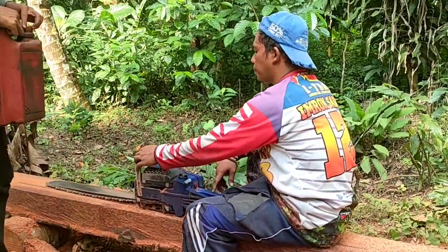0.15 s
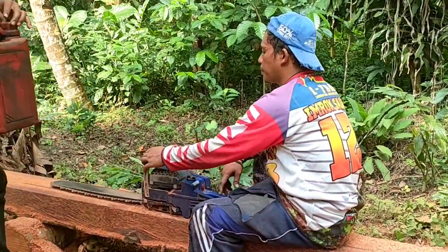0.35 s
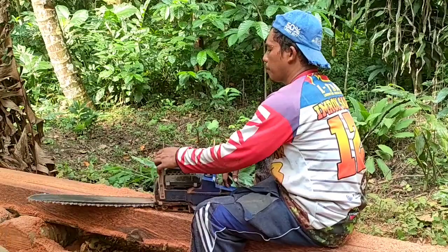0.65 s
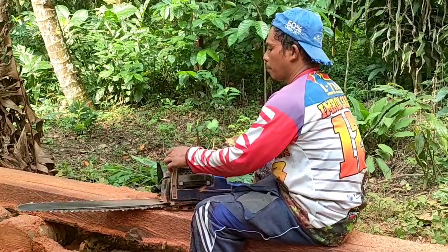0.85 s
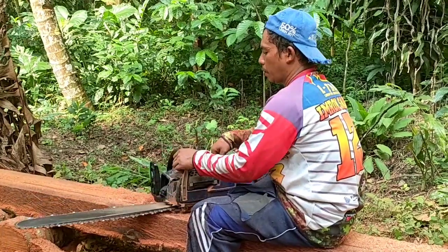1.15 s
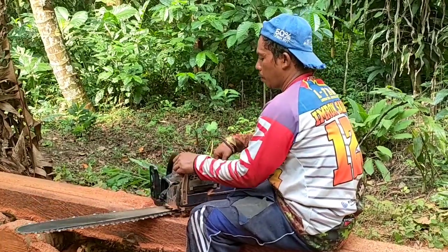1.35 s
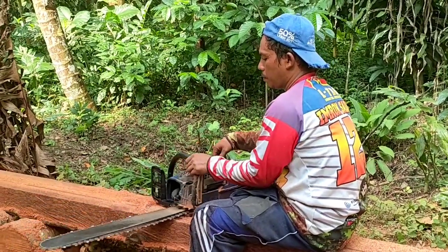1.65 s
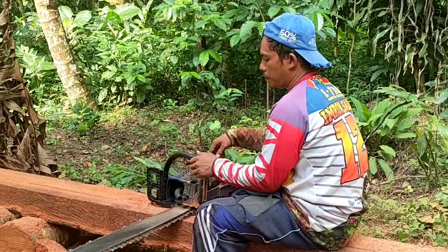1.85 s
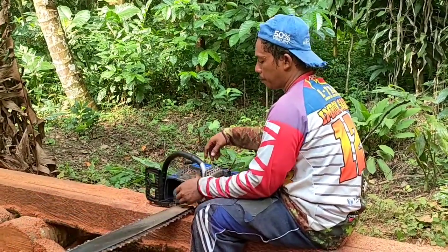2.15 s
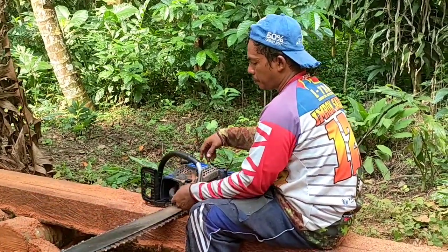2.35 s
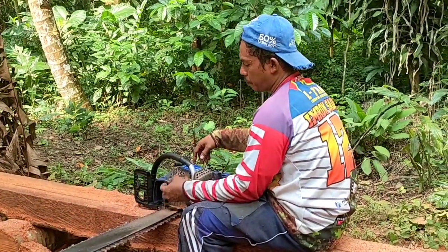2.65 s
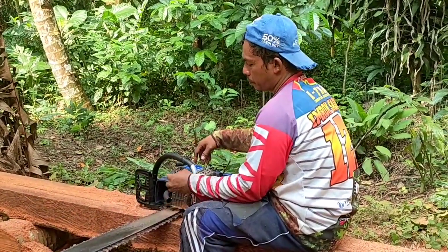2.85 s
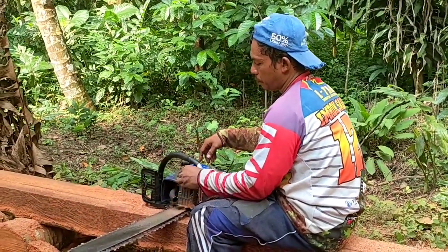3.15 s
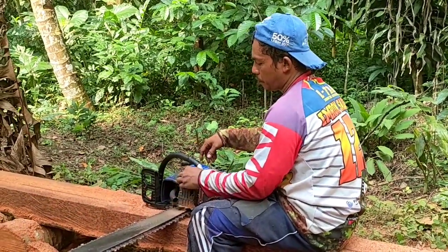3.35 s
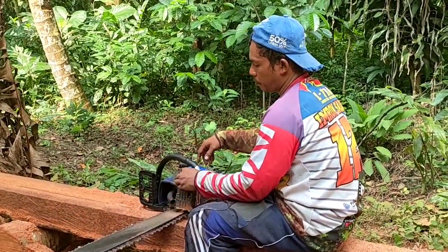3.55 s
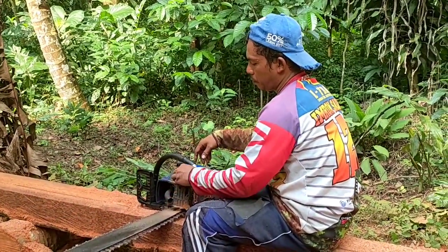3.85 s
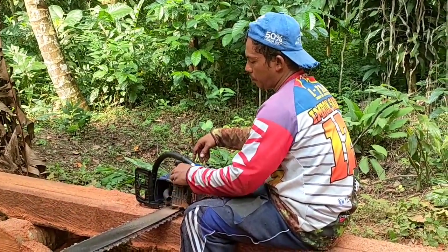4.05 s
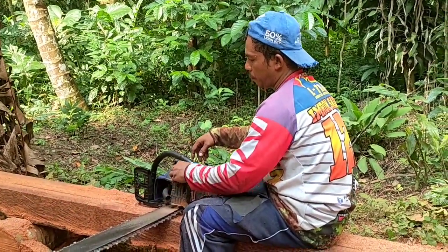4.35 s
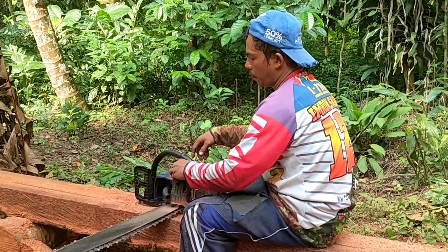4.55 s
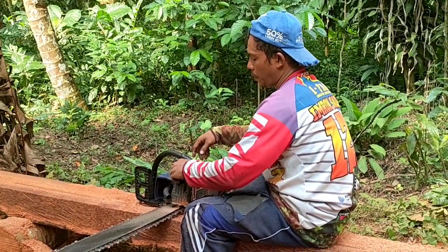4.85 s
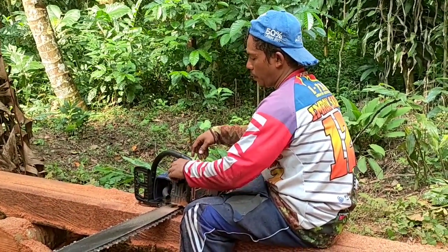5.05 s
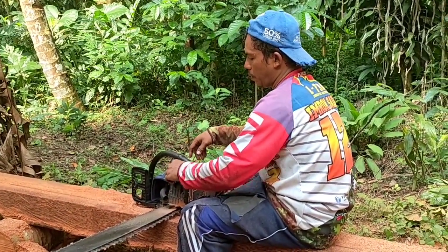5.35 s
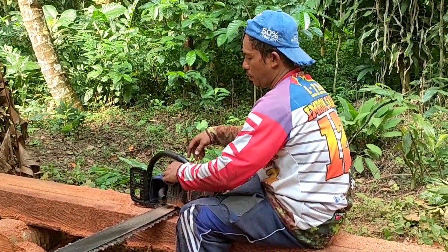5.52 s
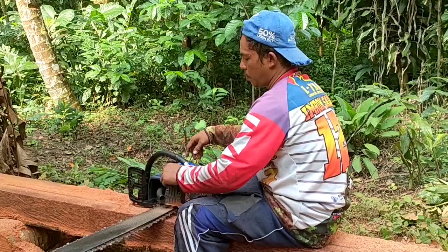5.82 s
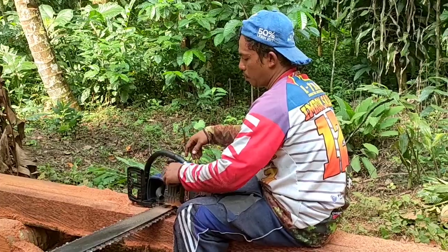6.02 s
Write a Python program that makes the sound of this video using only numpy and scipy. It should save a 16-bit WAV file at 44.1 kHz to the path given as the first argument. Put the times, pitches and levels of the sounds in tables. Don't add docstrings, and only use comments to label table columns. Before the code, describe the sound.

A close, dry outdoor stereo sound of hands handling a stopped chainsaw on a wooden beam, slightly left. From 0 to 0.8 s there is a busy flurry of small clicks, hollow casing taps, scraping and sleeve rustle, with a clear click at 0.5. After a lull, a cluster of taps and ticks comes at 1.2-1.5, then near quiet. At 2.3-2.4 dull bumps and ticks return; small ticks lead to a sharp bright snap at 2.9 with crisp rubbing until 3.1. Light clicks continue, one stronger at 3.75. From 4 s short rubbery squeaks appear. At 4.5 a hard, low wooden knock, by far the loudest, shakes loose parts and chain into a brief rattle. Squeaks fade by about 5 and sparse soft ticks and rubs continue to about 6.2. Faint leaves, insects and a wavering distant engine remain behind.

```python
import sys
import numpy as np
from scipy import signal
from scipy.io import wavfile
from scipy.ndimage import uniform_filter1d

SR = 44100
rng = np.random.default_rng(int(sys.argv[2]) if len(sys.argv) > 2 else 0)


def generate_wav(signal):
    frames = np.transpose(np.atleast_2d(signal))
    scaled = np.clip(frames, -1, 1) * 32767
    pcm = np.round(scaled).astype(np.int16)
    wavfile.write(sys.argv[1], SR, pcm)


def gain_from_db(level_db):
    decades = np.asarray(level_db, float) / 20
    return 10 ** decades


N = 272538
RATTLE_S = 4.4935


def rms_one(x):
    return x / np.sqrt(np.mean(x ** 2) + 1e-20)


def in_time(rows):
    s, *columns = np.transpose(rows)
    return [np.interp(np.arange(N) / SR, s, column) for column in columns]


def at_hz(points, hz):
    point_hz, values = np.array(points)[:, :2].T
    return np.interp(np.log(hz), np.log(point_hz), values)


def drift(rate):
    r = np.exp(-80 * np.pi * rate / SR)
    white = rng.standard_normal(N // 40 + 2002)
    slow = signal.lfilter([1], [1, -2 * r, r * r], white)[2000:]
    return np.interp(np.arange(N) / 40, np.arange(len(slow)), rms_one(slow))


def moves(rows, rise_db_s, fall_db_s, rest_db):
    s, hold, level_db = np.transpose(rows)[:, :, None]
    t = np.arange(0, N + 64, 64) / SR
    rise_db = rise_db_s * np.maximum(s - t, 0)
    fall_db = fall_db_s * np.maximum(t - s - hold, 0)
    each_db = level_db - rise_db - fall_db
    return np.interp(np.arange(N) / SR, t, np.maximum(each_db.max(axis=0), rest_db))


def band_pass(x, low_hz, high_hz, order=2):
    return signal.sosfilt(signal.butter(order, [low_hz, high_hz], "band", fs=SR, output="sos"), x)


def ring(x, hz, t60):
    r, w = gain_from_db(-60 / (t60 * SR)), 2 * np.pi * hz / SR
    return signal.lfilter([0, np.sin(w)], [1, -2 * r * np.cos(w), r * r], x + 1e-18)


def resonances(x, peaks):
    return rms_one(sum(gain_from_db(db) * np.sqrt(width_hz) * ring(x, hz, 2.0 / width_hz)
                       for hz, width_hz, db in peaks))


def grains(per_s, spread_db):
    sizes = gain_from_db(spread_db * np.minimum(rng.exponential(1, N), 4)) * rng.standard_normal(N)
    return rms_one(sizes * (rng.random(N) < per_s / SR))


def coloured(white, spectrum, patchy_db, mix=lambda band, hz: band):
    out, together = 0, drift(7.0)
    edges = spectrum[0][0] * 2 ** np.arange(0, 10, 1 / 3)
    edges = edges[edges < min(spectrum[-1][0] * 1.2, 17000)]
    for k, (low, high) in enumerate(zip(edges, edges[1:])):
        band = band_pass(white[k % 2], low, high)
        hz = np.sqrt(low * high)
        level_db = at_hz(spectrum, hz) + patchy_db * (together + drift(13.0))
        out = out + gain_from_db(level_db) * mix(band, hz)
    return rms_one(out)


def at_ports(x, count=17):
    x = x * np.ones((2, 1))
    return np.array([np.roll(x[0], -(count // 2)), np.roll(x[1], count - count // 2)])


def spread(x, likeness):
    share = np.clip(likeness, 0, 1)
    return np.sqrt(share) * at_ports(x[0]) + np.sqrt(1 - share) * x[1:]


def knock():
    # start in seconds, signed push, contact in seconds.
    touches = [
        (4.4946, .75, .008),
        (4.5108, 1, .0012),
        (4.5186, -.59, .0016),
        (4.5366, 1, .0065),
    ]
    # mode in Hz, signed strength at the struck spot, t60 in seconds.
    beam = [(88.5, -.058, .23), (149.6, .304, .061), (191.3, -.1, .24), (240.7, -1, .032),
            (249.1, .782, .087), (309.1, .144, .072), (453.8, .05, .086), (518.3, -.044, .117),
            (625.9, .051, .12), (776, -.006, .12)]
    force = np.zeros(N)
    for s, push, contact in touches:
        bump = np.sin(np.pi * np.arange(int(contact * SR)) / (contact * SR))
        force[round(s * SR):][:len(bump)] += push * bump / bump.sum()
    blow = sum(strength * ring(force, hz, t60) for hz, strength, t60 in beam)
    return at_ports(blow * gain_from_db(np.array([[.45], [-.45]])), count=5)


def twist():
    # mode in Hz, peak in dB, t60 in seconds, right port against left (signed ratio).
    modes = [(452, -18.5, .028, -.9), (600, -26, .03, -.4), (760, -39, .03, .8)]
    click, out = (np.arange(N) == round(4.5135 * SR)) * 1., 0
    for hz, level_db, t60, right in modes:
        mode = ring(ring(click, hz, t60), hz, t60)
        out = out + gain_from_db(level_db) * mode / np.abs(mode).max() * np.array([[1], [right]])
    return out


def rattle_shape(level_db, hold_s, t60):
    t = np.arange(N) / SR - RATTLE_S
    return (t > 0) * gain_from_db(level_db - 60 * np.clip(t - hold_s, 0, 1) / t60)


def clatter():
    noise = uniform_filter1d(rng.standard_normal((3, N)), size=2)
    return rattle_shape(-39, .02, .16) * spread(rms_one(band_pass(noise, 900, 4700)), 0.72)


def jingle():
    # resonance in Hz, width in Hz, level in dB.
    links = [(4150, 760, 10), (7100, 1300, -17), (9850, 700, -11), (11600, 600, -2), (13400, 700, -5)]
    return rattle_shape(-54, .018, .13) * spread(resonances(rng.standard_normal((3, N)), links), .7)


def thuds():
    # start in seconds, peak in dB, pitch in Hz, t60 in seconds, casing body in dB.
    slaps = [
        (4.496, -33, 476, 0.065, -7),
        (4.515, -28.5, 610, 0.2, 2.5),
        (4.538, -30, 455, 0.051, -0.5),
    ]
    # start in seconds, peak in dB, pitch in Hz, t60 in seconds.
    taps = [(.039, -47, 870, 0.046), (.198, -44.5, 810, 0.27), (.268, -40.5, 810, 0.15),
            (.529, -43.5, 835, 0.24), (.702, -47.5, 876, 0.22), (1.2275, -39.5, 780, 0.033),
            (1.237, -60, 750, 0.025), (1.372, -55, 820, 0.066), (1.417, -49.5, 810, 0.14),
            (1.495, -49, 786, 0.14), (1.273, -42, 755, 0.13), (1.349, -49, 875, .033),
            (2.3795, -37, 545, 0.045), (2.638, -44.5, 528, 0.052), (2.92, -52, 355, 0.018),
            (3.359, -39.5, 1080, 0.038), (3.946, -47.5, 714, 0.044)]
    # start in seconds, peak in dB, pitch in Hz, casing body in dB.
    bumps = [(0.098, -46.5, 169, -17), (1.509, -53, 175, 0), (1.805, -49, 183, -7.5), (1.914, -50, 140, -9),
             (2.381, -38.5, 191, 9.5), (2.394, -40.5, 197, 4), (2.416, -43.5, 274, 9.5),
             (2.515, -52.5, 192.6, 6.5), (3.365, -55.5, 190, -21), (3.515, -55, 175, -17),
             (3.893, -51, 156, 9), (4.038, -52, 140, -24), (4.364, -53.5, 124.2, -11),
             (4.738, -50.5, 120, -14), (4.868, -48, 193, -10), (4.987, -59, 125, 12), (5.014, -44, 172, 0),
             (6.124, -46, 165.9, 2)]
    tap_body_db, bump_t60 = -50, 0.052
    hits = list(slaps) + [(*row, tap_body_db) for row in taps]
    hits += [(s, level_db, hz, bump_t60, body_db) for s, level_db, hz, body_db in bumps]
    out, t = np.zeros(N + 8000), np.arange(8000) / SR
    for s, level_db, hz, t60, body_db in hits:
        push = rng.standard_normal(len(t)) * gain_from_db(-60 * t / (0.45 * t60))
        body = band_pass(push, 300, 1200)
        tone = ring(np.diff(push, prepend=0), hz, 4.4 / hz)
        tone = ring(tone, hz, min(t60, 22 / hz))
        hit = tone / np.abs(tone).max() + gain_from_db(body_db) * body / np.abs(body).max()
        out[round(s * SR):][:len(t)] += gain_from_db(level_db) * hit
    return out[:N]


def snaps():
    # start in seconds, peak in dB, low mode in Hz, high mode in Hz, t60 in seconds.
    contacts = [(.0139, -35, 1500, 5500, .012), (.0408, -39, 1000, 4000, .015),
                (.0548, -39, 1200, 5500, .012), (.0680, -38, 1500, 4500, .012),
                (.0762, -38, 1500, 4600, .015), (.1022, -36, 900, 4200, .015),
                (.5036, -36, 1900, 4300, .03), (2.9247, -20, 3000, 5540, .018),
                (2.9262, -31, 3500, 5200, .02), (3.7502, -28.5, 2560, 4740, .016),
                (3.7625, -38, 3300, 4700, .012), (.124, -42, 4000, 4300, .015),
                (.0475, -40, 1300, 5500, .012), (1.2362, -40, 3200, 3600, .02),
                (1.3735, -42, 2300, 3400, .015), (2.858, -37, 2850, 3500, .02),
                (4.5875, -37, 2100, 2900, .03), (2.4135, -33, 3100, 4100, .02),
                (2.421, -38, 3100, 4600, .02), (2.3985, -38, 3100, 4500, .015)]
    out, t = np.zeros((2, N + 2000)), np.arange(2000) / SR
    wide = signal.butter(2, 1500, "high", fs=SR, output="sos")
    for s, level_db, low_hz, high_hz, t60 in contacts:
        shared, left, right = rng.standard_normal((3, len(t))) * gain_from_db(-60 * t / .009)
        shared[0] += 5
        push = shared + .4 * np.array([left, right])
        softness = signal.butter(4, high_hz ** 2 / 3800, fs=SR, output="sos")
        push = signal.sosfilt(softness, push)
        modes = ring(push, low_hz, .3 * t60) + .8 * ring(push, high_hz, .35 * t60)
        modes = modes + .3 * ring(push, 1.3 * high_hz, .25 * t60)
        crack = signal.sosfilt(wide, push)
        hit = .8 * modes / np.abs(modes).max() + 1.1 * crack / np.abs(push).max()
        out[:, round(s * SR):][:, :len(t)] += gain_from_db(level_db + 2.5) * hit
    return out[:, :N]


def ticks():
    # start in seconds, peak in dB, pitch in Hz, t60 in seconds.
    touches = [(0.8288, -46, 3570, 0.017), (1.225, -34.5, 1770, 0.042), (1.271, -38, 3300, 0.032),
               (1.3707, -41, 3180, 0.031), (1.43, -51, 2760, 0.018), (1.5083, -44.5, 2680, 0.043),
               (2.308, -34.5, 3640, 0.029), (2.381, -49, 2920, 0.041), (2.396, -32.5, 3280, 0.068),
               (2.413, -34.5, 3480, 0.17), (2.44, -48, 3440, 0.031), (2.7085, -41, 3630, 0.031),
               (2.7313, -40.5, 3520, 0.026), (2.7386, -37, 5500, 0.019), (2.7716, -42, 3500, .025),
               (2.8224, -42, 2300, 0.023), (2.8587, -45, 3040, 0.044), (2.9055, -34, 2980, 0.023),
               (3.37, -41.5, 4300, 0.029), (3.581, -43, 2630, 0.026), (3.607, -39.5, 3300, 0.089),
               (3.7136, -45.5, 2344, 0.02), (3.833, -40, 4680, 0.058), (4.5064, -39, 3000, 0.1),
               (4.586, -32.5, 3600, 0.13), (4.8651, -37.5, 4390, 0.024), (5.036, -35.5, 1750, 0.019),
               (5.653, -32, 4467, 0.025), (6.1204, -39, 2147, 0.055), (3.427, -41.5, 4800, 0.14),
               (3.446, -36, 5100, 0.071), (3.894, -38, 4630, 0.15), (4.4951, -48, 2200, 0.047),
               (4.512, -29.5, 4170, 0.11), (4.522, -52, 2600, 0.055), (4.588, -36.5, 2100, 0.13),
               (2.362, -46, 3600, .04), (2.478, -45, 3500, 0.086), (1.25, -40, 3980, 0.035),
               (1.416, -40, 3530, .02), (1.445, -45, 3500, .025)]
    build_s, crack_db = 0.0023, -13.5
    out, t = np.zeros((2, N + 8000)), np.arange(8000) / SR
    for s, level_db, hz, t60 in touches:
        shape = np.minimum(t / build_s, 1) * gain_from_db(-60 * np.maximum(t - build_s, 0) / t60)
        shared, left, right = rng.standard_normal((3, len(t)))
        burst = shape * (shared + .6 * np.array([left, right]))
        body = ring(ring(np.diff(burst, prepend=0), hz, 11 / hz), hz, 4 / hz)
        crack = band_pass(burst, 1300, 7500)
        hit = body / np.abs(body).max() + gain_from_db(crack_db) * crack / np.abs(crack).max()
        out[:, round(s * SR):][:, :len(t)] += gain_from_db(level_db - 5.0) * hit
    return out[:, :N]


def needles():
    # start in seconds, mode peak in dB, pitch in Hz, t60 in seconds, wide click in dB.
    touches = [(.5033, -32, 2300, .008, -33), (.5046, -27, 3720, .016, -40), (.5038, -35, 3500, .02, -60),
               (2.9247, -31, 6800, .01, -26), (2.9249, -27, 3100, .012, -40),
               (2.9252, -40, 11800, .008, -34), (2.9248, -33, 8800, .008, -50),
               (4.4977, -48, 9960, .02, -44), (.0412, -42, 1000, .02, -43), (.0775, -42, 650, .02, -48),
               (.1028, -41, 800, .025, -46), (.0688, -45, 1200, .015, -48), (1.2282, -44, 1950, .025, -50),
               (1.2365, -44, 3250, .02, -50), (1.237, -43, 790, .04, -60), (2.8578, -40, 2850, .015, -42),
               (.9438, -50, 8600, .01, -46), (1.3465, -47, 3050, .02, -52), (1.4311, -52, 11500, .006, -45),
               (1.432, -47, 2650, .02, -55), (2.3082, -46, 3400, .015, -50), (2.4, -44, 1700, .04, -55),
               (2.4225, -40, 3050, .02, -50), (2.7108, -42, 3380, .012, -48),
               (2.7323, -42, 3360, .015, -52), (2.9068, -36, 4600, .008, -38),
               (2.9158, -42, 3200, .008, -42), (3.1608, -42, 4570, .012, -46), (3.455, -46, 5200, .02, -55),
               (3.6125, -48, 5200, .015, -51), (3.7502, -52, 12000, .006, -50),
               (3.8332, -52, 9990, .02, -48), (3.897, -44, 560, .05, -55), (4.494, -33, 55, .07, -54),
               (4.5865, -42, 3300, .02, -44), (6.0975, -52, 7250, .012, -48)]
    out, click = np.zeros(N + 6000), (np.arange(6000) == 0) * 1.
    wide = band_pass(click, 900, 7500)
    wide = wide / wide.max()
    for s, level_db, hz, t60, needle_db in touches:
        out[round(s * SR):][:len(click)] += gain_from_db(level_db) * ring(click, hz, t60) + gain_from_db(needle_db) * wide
    return at_ports(out[:N], count=13)


def scrape():
    # start in seconds, hold in seconds, level in dB.
    drags = [(.055, 0.05, -53), (.21, 0.086, -53), (.33, 0.21, -54.5), (.52, 0.12, -53.5),
             (.68, 0.066, -60), (.8, 0.018, -59), (1.24, 0.068, -61), (1.34, 0.0092, -53),
             (1.43, 0.1, -59.5), (2.385, 0.013, -61), (2.655, 0.011, -65.5), (2.855, 0.011, -60),
             (2.92, 0.16, -61), (3.17, 0.0063, -56.5), (3.37, 0.0044, -57), (3.61, 0.021, -61.5),
             (3.735, 0.018, -66), (3.84, 0.22, -62.5), (4.08, 0.21, -64), (4.355, 0.042, -58.5),
             (4.51, 0.025, -59), (4.6, 0.14, -62), (4.85, 0.016, -56.5), (4.98, 0.046, -59.5),
             (5.13, 0.014, -63.5), (5.4, 0.059, -61.5), (5.64, 0.03, -59), (5.855, 0.013, -58.5),
             (6.105, 0.024, -60)]
    # start in seconds, hold in seconds, level in dB.
    shifts = [(.09, 0.0091, -64), (.19, 0.026, -67), (.91, 0.035, -57), (1.21, 0.061, -60.5),
              (1.64, 0.24, -61.5), (2.33, 0.022, -63), (2.44, 0.16, -61), (2.69, 0.14, -63.5),
              (2.91, 0.36, -61), (3.27, 0.047, -56.5), (3.38, 0.098, -58.5), (3.73, 0.12, -67),
              (4.46, 0.029, -57), (4.56, 0.0055, -38), (4.65, 0.12, -57), (4.9, 0.013, -56),
              (5.13, 0.011, -57), (5.4, 0.1, -61), (5.65, 0.02, -60.5), (5.86, 0.41, -62.5)]
    # resonance in Hz, width in Hz, level in dB.
    casing = [(520, 200, -8), (800, 170, 0), (1100, 170, -4), (1350, 300, -10)]
    # resonance in Hz, width in Hz, level in dB.
    thrum = [(140, 3.5, -3), (192, 58, 16), (236, 220, -38)]
    scrape_db = moves(drags, 201, 173, -74)
    thrum_db = moves(shifts, 196, 168, -69.5)
    slips = np.array([grains(2500, 2.0) for port in range(3)]) * gain_from_db(1.0 * drift(60.0))
    jolts = np.array([grains(430, 4.2) for port in range(3)])
    dragging = spread(gain_from_db(scrape_db) * resonances(slips, casing), 0.0086)
    return dragging + spread(gain_from_db(thrum_db) * resonances(jolts, thrum), 0.64)


def rustle(level_db, spectrum, per_s, likeness):
    slips = np.array([[grains(per_s, 4.0) for port in range(3)] for turn in range(2)])
    slips = slips * gain_from_db(1.2 * drift(70.0))
    return gain_from_db(level_db) * spread(coloured(slips, spectrum, .5), likeness)


def rubbing():
    # start in seconds, hold in seconds, rustle in dB, crispness above 7 kHz in dB over the rustle.
    rubs = [(0.053, 0.039, -49, -7.5), (0.223, 0.046, -52, -9), (0.495, 0.2, -54, -24.5),
            (0.79, 0.027, -59.5, -2.5), (0.935, 0.013, -55, -0.5), (1.23, 0.051, -56, -14.5),
            (1.34, 0.11, -58, -9), (1.736, .15, -66, -6.5), (2.415, 0.026, -54, -13),
            (2.468, 0.024, -60.5, 1), (2.72, 0.044, -59.5, -4), (2.806, 0.064, -57, -2.5),
            (2.89, 0.048, -47, -10), (2.967, 0.096, -48, -6), (3.062, 0.028, -45, -8),
            (3.158, 0.059, -54.5, -5), (3.335, 0.04, -56.5, -5.5), (3.43, 0.044, -66.5, -1.5),
            (3.574, 0.023, -57, -5), (3.75, 0.0092, -58.5, -14), (3.841, 0.0408, -55.5, -2),
            (3.885, 0.024, -55, -4), (4.008, 0.14, -59.5, -9), (4.331, 0.062, -54.5, -10),
            (4.568, 0.17, -58.5, -21), (4.852, 0.13, -59, -13.5), (5.01, 0.25, -64, -22),
            (5.393, 0.019, -59.5, -37), (5.654, 0.022, -51.5, -8.5), (5.835, 0.063, -57, -13),
            (6.111, 0.0081, -50.5, -9)]
    # frequency in Hz, level in dB per Hz.
    cloth = [(880, -43), (1500, -13), (2800, -10.5), (3090, -9.5), (4670, -6), (6130, -24.5), (6860, 6.5),
             (8000, -51), (10400, -68), (17600, -120)]
    # frequency in Hz, level in dB per Hz.
    crisp = [(4500, -31), (6500, -0.5), (7400, -10), (8100, -8), (9460, 2.5), (11500, -6.5), (13200, -7.5),
             (15500, -14)]
    rustle_db = moves([row[:3] for row in rubs], 211, 119, -94)
    crisp_db = moves([(s, hold, db + over_db) for s, hold, db, over_db in rubs], 296, 169, -76)
    return rustle(rustle_db, cloth, 2500, .6) + rustle(crisp_db, crisp, 7000, .55)


def squeak():
    # start in seconds, hold in seconds, level in dB.
    slips = [(4.02, 0.017, -42.5), (4.12, .01, -45), (4.245, .01, -45), (4.335, 0.04, -42.5),
             (4.42, .025, -43.5), (4.54, 0.017, -56), (4.7, 0.031, -42), (4.74, .07, -47.5),
             (4.82, 0.043, -40.5), (4.89, 0.11, -50), (5.03, 0.016, -48)]
    hz = 1691
    note = ring(ring(rng.standard_normal(N), hz, .009), hz, .025) * gain_from_db(3.5 * drift(25.0))
    return gain_from_db(moves(slips, 452, 320, -100) - 11.5) * rms_one(note)


def port_colour(x):
    return x + .3 * band_pass(x, 480, 720, order=1) * [[1], [-1]]


def clearing(x):
    dull, out = signal.lfilter([.4], [1, -.6], x), np.zeros((2, N))
    for k, lag in enumerate(rng.uniform(0.0046, 0.04, 12)):
        out[k % 2] += gain_from_db(-300 * lag) * (-1) ** (k // 2) * np.roll(dull[k % 2], int(lag * SR))
    return out


def far_engine():
    # time in seconds, drone in Hz, level in dB.
    drone = [(0.0, 63.5, -87), (1.1, 64.2, -66), (1.85, 67.6, -98), (2.15, 70.2, -64.5), (2.34, 94.1, -72),
             (2.7, 89.4, -61), (2.96, 64, -62.5), (3.56, 67.1, -84), (3.82, 65.5, -59.5), (4.08, 76.9, -57),
             (4.72, 80, -53.5), (5.08, 71.5, -53), (5.32, 72.4, -50.5), (5.6, 68, -81), (5.78, 87.6, -54.5),
             (5.96, 84.4, -52), (6.02, 76.8, -61.5), (6.18, 80.3, -45)]
    hz, level_db = in_time(drone)
    phase = 2 * np.pi * np.cumsum(hz + 11.33 * drift(16.5)) / SR
    return gain_from_db(level_db + 0.5 + 2.5 * drift(41.0)) * np.sin(phase)


def insects():
    # time in seconds, level in dB.
    swell = [(0.0, -55), (1.1, -56.5), (1.5, -65.5), (2.79, -69), (3.03, -49.5), (3.58, -84), (3.97, -63),
             (4.28, -81), (4.8, -65), (5.63, -61), (6.18, -56.5)]
    # resonance in Hz, width in Hz, level in dB.
    chorus = [(4123, 130, -5.5), (4590, 440, 1), (5820, 950, -1.5)]
    return gain_from_db(in_time(swell)[0] + 2.0) * resonances(rng.standard_normal((2, N)), chorus)


def forest():
    # frequency in Hz, level in dB per Hz.
    floor = [(12, -12), (20, 10), (47, 5), (98, -13.5), (180, -0.5), (306, -9.5), (598, -3), (908, -22),
             (1070, -8.5), (1500, -17), (4560, -11), (6740, -17.5), (8190, -41.5), (9950, 15), (15500, -64)]
    # frequency in Hz, share from the saw's side (0 to 1).
    side_share = [(30, 0.54), (150, 0.7), (600, 0.97), (1500, 0.11), (15000, 0.057)]
    white = rng.standard_normal((2, 3, N))
    air = coloured(white, floor, .8, lambda band, hz: spread(band, at_hz(side_share, hz)))
    return gain_from_db(-56.5 - 4.0) * air


def scene():
    hits = at_ports(ticks() + thuds()) + at_ports(snaps(), count=14)
    hits = hits + gain_from_db(-11) * clearing(hits)
    blow = knock() + twist() + clatter() + jingle()
    handling = port_colour(hits + scrape()) + needles() + rubbing() + at_ports(squeak())
    return blow + handling + far_engine() + insects() + forest()


def band_limit(x):
    return signal.sosfilt(signal.butter(12, 15690, fs=SR, output="sos"), x)


def record(dry):
    mix = signal.sosfilt(signal.cheby2(12, 60, 16100, fs=SR, output="sos"), dry)
    return band_limit(mix)


dry = scene()
out = record(dry)
generate_wav(out)
```